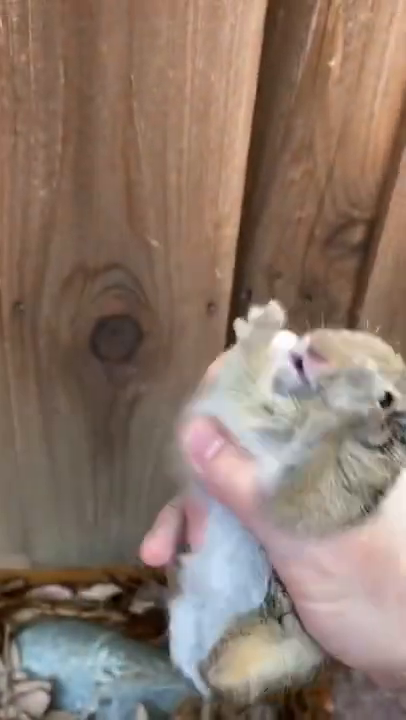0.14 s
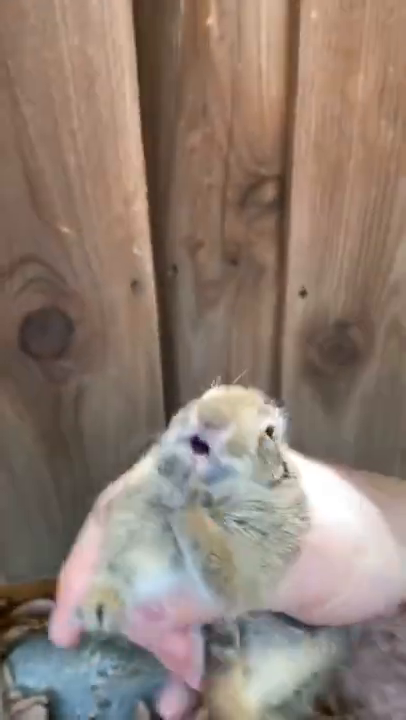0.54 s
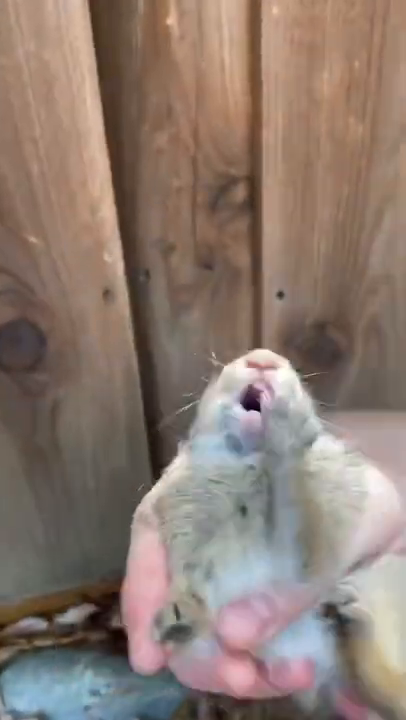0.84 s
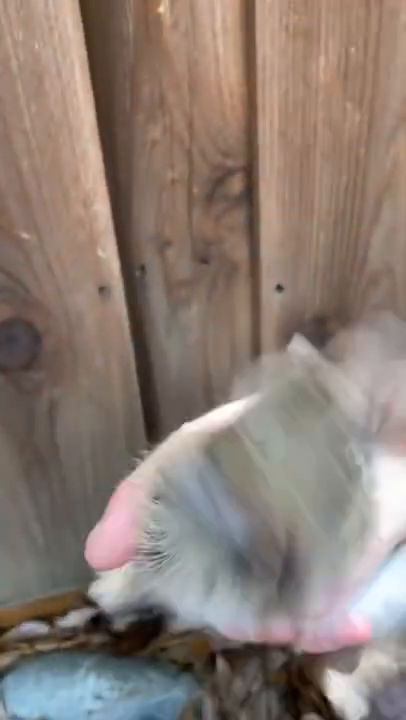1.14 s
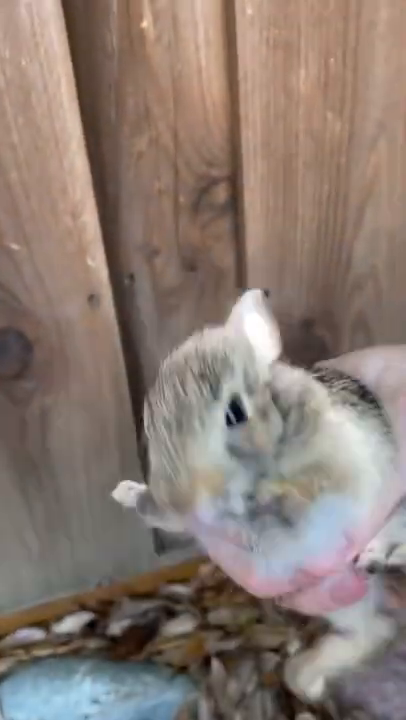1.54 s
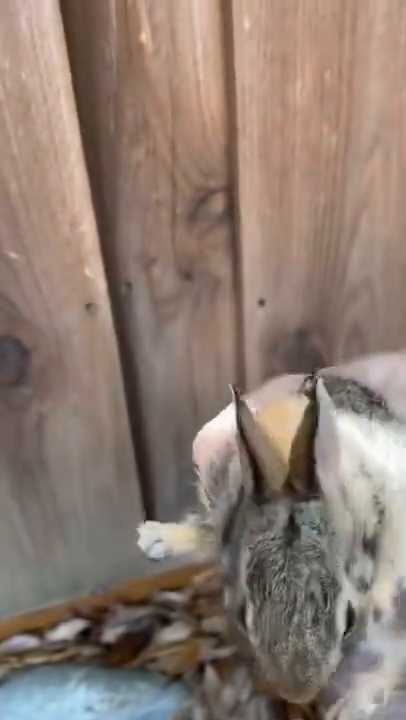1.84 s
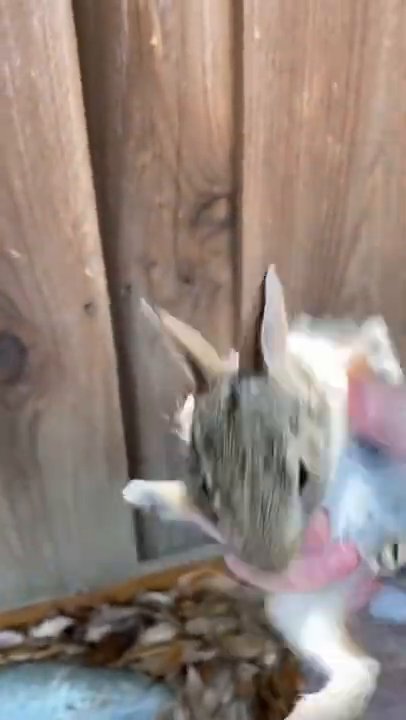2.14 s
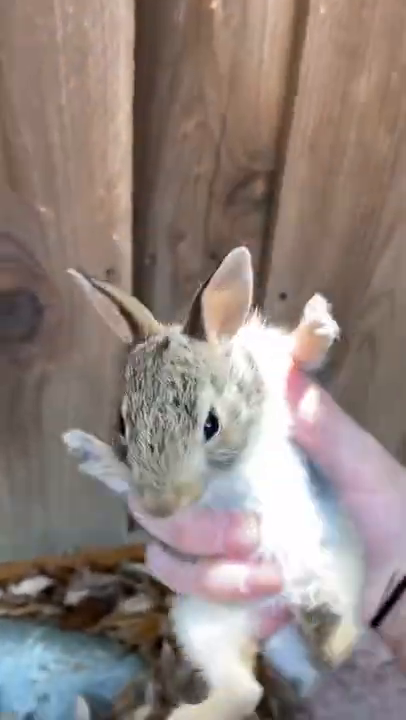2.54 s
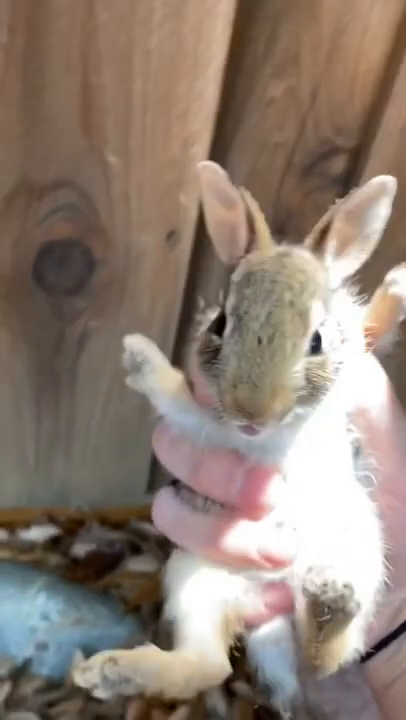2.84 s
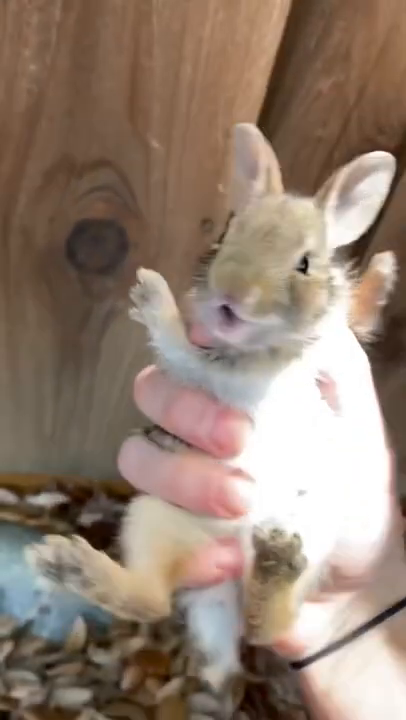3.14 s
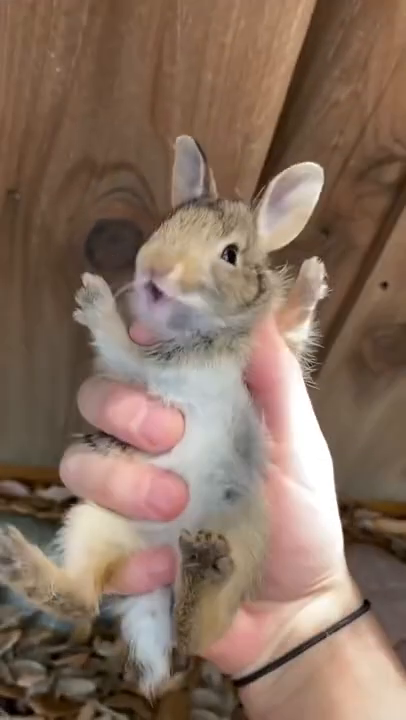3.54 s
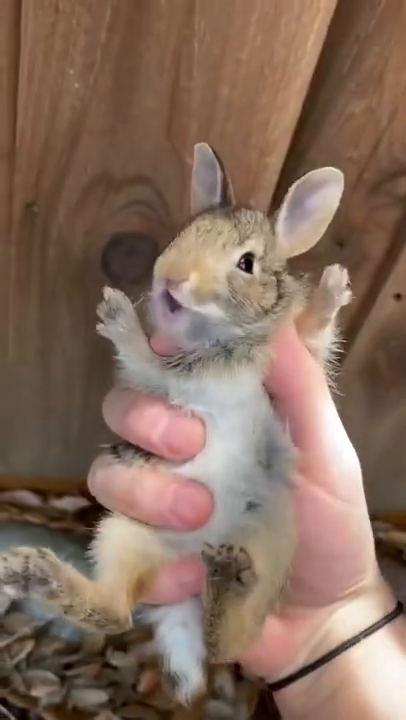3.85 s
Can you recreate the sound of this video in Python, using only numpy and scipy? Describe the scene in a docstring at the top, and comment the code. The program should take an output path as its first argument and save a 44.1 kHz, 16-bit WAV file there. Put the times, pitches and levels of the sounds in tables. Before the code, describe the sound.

A young rabbit squeals loudly and harshly again and again, close up in a yard

```python
"""Young rabbit squealing, close

In a yard, before a wooden fence: a young rabbit held in the hand squeals twelve times close to a phone in stereo.
Each squeal is a stack of overtones through gliding resonances: thin while the mouth is nearly shut, fuller as it
opens, then sagging in pitch and breaking into a rasp. Decaying noise gives the yard's faint tail; below lie
low outdoor rumble and hiss of filtered noise, faint far tones of wavering sine and two soft handling bumps."""
import sys
import numpy as np
from scipy import signal
from scipy.fft import rfft, irfft
from scipy.io import wavfile
from scipy.ndimage import uniform_filter1d

SR = 44100
rng = np.random.default_rng(int(sys.argv[2]) if len(sys.argv) > 2 else 0)


def unload_wav(signal):
    """Save mono or channel-first audio to the path in sys.argv[1] as 16-bit WAV at rate SR, clipped to [-1, 1]."""
    wavfile.write(
        sys.argv[1],
        SR,
        np.round(np.clip(np.atleast_2d(signal).T, -1, 1) * 32767).astype(np.int16),
    )


N = 176400

# outdoor rumble, relative spectrum: [f/Hz, level/dB]
RUMBLE_SPECTRUM = [(20, -28), (32, -24.5), (45, -6), (62, 4.5), (85, 0), (120, -2.5), (170, -12.5),
                   (250, -19), (400, -26), (600, -34.5), (1200, -41), (2500, -41.5), (6000, -51)]
# faint far tones: [start t/s, length t/s, f/Hz, peak level/dB]
FAR_TONES = [(-.05, 0.43, 422, -68.5), (0.809, 0.22, 368, -69.5), (3.025, 0.337, 398.5, -66.5),
             (3.543, 0.18, 363, -70)]
# handling bumps: [t/s, level/dB, f/Hz]
BUMPS = [(1.618, -44.5, 85), (2.319, -43.5, 150)]
# relative colour of the yard's long tail: [f/Hz, level/dB]
YARD_COLOUR = [(500, -17), (1000, 3.5), (2500, 9), (4300, 0), (5500, -8.5), (8000, -14), (12000, -5),
               (16000, -22)]
# first echoes from the hand, fence and ground: [delay t/s, level/dB]
ECHOES = [(.0008, -22.5), (.0021, -20.5), (.0041, -23)]
# phase between the two microphone ports: [f/Hz, lead of left over right/rad]
PORT_PHASE = [(100, 0), (1000, .3), (3000, .25), (4200, .85), (5200, .55), (6000, 1.5), (6900, 3),
              (7600, 3.3), (9000, 4.7), (10000, 6.1), (11000, 6.4), (12000, 7.8), (13200, 9.3),
              (14300, 9.6), (16000, 12)]
# level between the two microphone ports: [f/Hz, left minus right level/dB]
PORT_BALANCE = [(100, 0), (1000, -1), (2400, 0), (3400, -4), (4400, -5), (5000, .3), (7000, 0)]
# throat and mouth resonances in three groups, not in order of pitch; the steady ones have no level per squeal:
# [f shut/Hz, f wide open/Hz, width/Hz, level shut/dB, level wide open/dB]
STEADY_RESONANCES = [(1080, 1100, 870, -10, -16.5), (2240, 2600, 654, 3.5, -22), (4400, 5160, 817, -9, 10)]
FOUR_KHZ_RESONANCE = [(3290, 4250, 854, 0.81, -1.8)]
UPPER_RESONANCES = [(5750, 6335, 810, -9, 0.5), (9570, 8010, 1580, 1, -2),
                    (12400, 10800, 2000, -10.5, -11.5), (14200, 13140, 1900, -1.5, -7.5)]
# one row per squeal: [start t/s, end t/s, time for the mouth to open t/s, widest opening (0-1),
# roughness (0-1), four-kHz resonance level/dB, upper resonances level/dB]
SQUEALS = [(-.15, 0.041, .1, 0.67, 0.1, -11.5, 6), (0.158, 0.471, 0.19, 0.99, 0.18, -7, 8),
           (0.595, 0.809, .12, 0.91, 0.25, -9.5, 5.5), (0.971, 1.241, 0.12, 0.68, 0.2, -2, 5),
           (1.445, 1.612, 0.12, 0.95, 0.11, 0.5, 1), (1.757, 1.949, 0.12, 0.84, 0.2, 1.5, 2.5),
           (2.132, 2.309, 0.075, .9, 0.18, -1, 2), (2.496, 2.692, 0.077, 0.88, 0.4, -3, 2.5),
           (2.825, 3.011, 0.079, 0.94, 0.23, -7, 2.5), (3.205, 3.406, 0.076, 0.98, 0.42, -2.5, 2.5),
           (3.535, 3.733, 0.089, 0.93, 0.25, -2.5, 0), (3.869, 4.07, 0.086, 0.93, .18, 0, 1)]
# course of the first squeal, under way at the start: [t/s, pitch f/Hz, level/dB before VOICE_DB]
FIRST_COURSE = [
    [(0.004, 935, -26), (0.024, 907, -34.5), (0.035, 936, -39.5)],
]
# courses of the other squeals: [t/s, pitch f/Hz, level/dB before VOICE_DB]
LATER_COURSES = [
    [(0.169, 1044, -47.5), (0.181, 1230, -36.5), (0.197, 1233, -27), (0.215, 1137, -30),
     (0.287, 963.7, -28.5), (0.381, 990, -18.5), (0.413, 1027, -21.5), (0.453, 868, -25), (0.466, 771, -35)],
    [(0.603, 1154, -42.5), (0.653, 1147, -28), (0.681, 997, -25), (0.711, 1086, -21.5), (0.729, 1034, -23),
     (0.777, 1012, -23), (0.785, 869, -22.5), (0.802, 827, -31)],
    [(0.982, 1096, -51), (0.994, 1159, -37.5), (1.016, 1170, -31), (1.072, 1037, -23), (1.106, 975, -25.5),
     (1.176, 1015, -24.5), (1.196, 905, -26.5), (1.204, 958, -26.5), (1.238, 814, -34.5)],
    [(1.452, 1080, -45.5), (1.482, 1034, -36.5), (1.52, 1060, -24), (1.554, 1072, -23), (1.596, 824, -29.5),
     (1.604, 833, -42.5)],
    [(1.772, 956, -53.5), (1.788, 1044, -44), (1.83, 998.3, -30), (1.876, 1067, -25), (1.892, 1047, -25),
     (1.918, 986.5, -27.5), (1.93, 841, -27.5), (1.94, 848, -36)],
    [(2.138, 1052, -43), (2.152, 980, -38), (2.176, 1047, -25.5), (2.206, 1109, -23.5),
     (2.248, 1074, -21.5), (2.276, 1040, -22.5), (2.288, 936, -24), (2.298, 934, -39)],
    [(2.503, 993, -45), (2.517, 976, -38.5), (2.553, 1031, -24), (2.583, 1087, -23), (2.635, 1059, -22.5),
     (2.653, 997, -21.5), (2.663, 972, -23), (2.667, 858, -22.5), (2.684, 783, -37.5)],
    [(2.83, 988, -43), (2.84, 975, -41), (2.86, 950, -29.5), (2.886, 992, -22.5), (2.91, 1013, -20.5),
     (2.93, 1077, -20.5), (2.97, 984, -20), (2.982, 981, -21.5), (3.004, 821.5, -31)],
    [(3.21, 1013, -45.5), (3.222, 1005, -34), (3.254, 1022, -24), (3.296, 1097, -20.5),
     (3.358, 1040, -20.5), (3.366, 1022, -20.5), (3.382, 926, -24.5), (3.39, 846, -26), (3.398, 818, -32.5)],
    [(3.544, 941, -51.5), (3.56, 923.6, -36), (3.598, 953.4, -27), (3.628, 1026, -23.5),
     (3.666, 1013, -20.5), (3.692, 989, -25), (3.704, 951, -22.5), (3.714, 835.5, -29.5),
     (3.725, 818, -35.5)],
    [(3.876, 950, -45), (3.888, 889, -40.5), (3.91, 938.6, -32), (3.92, 930, -30), (3.964, 1012, -22),
     (3.992, 999.3, -22.5)],
]

# background and handling
RUMBLE_DB, RUMBLE_SIDE_DB, HISS_DB = -60.5, -21, -90.5  # the side level is relative to the rumble
BUMP_SCUFF_HZ, BUMP_DECAY_S, BUMP_SCUFF_DB = 348, 0.0082, -11
# the place: total level against the voice, and time to fall by 60 dB
FENCE_DB, FENCE_T60_S = -27, .075
YARD_DB, YARD_T60_S = -35, .6
# time course of a squeal
ATTACK_S, RELEASE_S = 0.0046, 0.0034
CATCH_S, CATCH_ROUGH = .035, .4  # roughness added as the voice catches
BREAK_S, BREAK_ROUGH = .03, 1.45  # lead of the break before the end, roughness added
BREAK_DB_PER_OCTAVE = -3.5  # the breaking voice darkens
RESONANCE_SAG = 0.015  # share by which the resonances fall as the voice breaks
FINAL_DROP, DROP_S = 0.041, 0.0067  # share by which the pitch drops at the very end
# unsteadiness: pitch depths as shares; all but the tremor and flicker grow with roughness
TREMOR, TREMOR_HZ = .004, 45
WOBBLE, WOBBLE_HZ = .016, 172
JITTER, JITTER_HZ = .012, 420
SHIMMER_DB, SHIMMER_HZ = 1, 180
FLICKER_DB, FLICKER_HZ = 3.5, 12.7  # each overtone wavers in strength; depth at 5 kHz
# breath noise around each overtone: level at 5 kHz and roughness 1
AIR_DB, AIR_DB_PER_OCTAVE, AIR_SPREAD_HZ = -12, 8, 520
CATCH_AIR_DB = 5.5  # extra air before the mouth is open
VOICE_DB = 2.5  # lift on the course levels
TOP_HZ = 15800


def undb(db):
    """Decibels to gain."""
    return 10 ** (np.asarray(db) / 20)


def unit(x):
    """Scale to rms 1."""
    return x / np.sqrt(np.mean(x ** 2))


def per_bin(points):
    """A table by frequency, read at every bin along a logarithmic axis."""
    hz, value = np.array(points, float).T
    bins = np.fft.rfftfreq(N, 1 / SR)
    return np.interp(np.log(bins + 1), np.log(hz), value)


def coloured(points):
    """Noise of rms 1 with the given spectrum."""
    white = rfft(rng.standard_normal(N))
    return unit(irfft(white * undb(per_bin(points)), N))


def flutter(hz, order=2):
    """Random motion of rms 1: noise low-passed at hz."""
    lowpass = signal.butter(order, hz, fs=SR, output="sos")
    return unit(signal.sosfilt(lowpass, rng.standard_normal(N)))


def background(t):
    """Low rumble, nearly alike in both channels, a trace of hiss and a few far tones."""
    spectrum = list(RUMBLE_SPECTRUM) + [(16000, -60.5)]
    middle = coloured(spectrum)
    side = undb(RUMBLE_SIDE_DB) * coloured(spectrum) * np.array([[1], [-1]])
    hiss = undb(HISS_DB) * rng.standard_normal((2, N))
    out = undb(RUMBLE_DB) * (middle + side) + hiss
    waver = 1 + 0.073 * flutter(30)  # shared pitch waver of the far tones
    for start, length, hz, db in FAR_TONES:
        swell = np.sin(np.pi * np.clip((t - start) / length, 0, 1))
        tone = np.sin(2 * np.pi * np.cumsum(hz * waver) / SR)
        out = out + undb(db) * swell * tone
    return out


def bumps(t):
    """Dull knocks, decaying sines with a little scuff noise, as the rabbit kicks in the hand."""
    out = 0
    scuff = undb(BUMP_SCUFF_DB) * flutter(BUMP_SCUFF_HZ)
    for at, db, hz in BUMPS:
        age = np.maximum(t - at, 0)
        envelope = np.minimum(age / 0.0023, 1) * np.exp(-age / BUMP_DECAY_S)
        knock = np.sin(2 * np.pi * hz * age)
        out = out + undb(db) * (knock + scuff) * envelope
    return out


def tail(t, t60, noise):
    """Exponentially decaying noise of total energy 1, beginning after 3 ms."""
    decay = noise * np.exp(-np.log(1000) * t / t60) * (t > .003)
    return decay / np.sqrt(np.sum(decay ** 2))


def yard(x, t):
    """Quick scatter from fence and ground and a faint longer tail, drawn separately per channel."""
    channels = []
    for _ in range(2):
        scatter = undb(FENCE_DB) * tail(t, FENCE_T60_S, rng.standard_normal(N))
        long_tail = undb(YARD_DB) * tail(t, YARD_T60_S, coloured(YARD_COLOUR))
        channels.append(signal.fftconvolve(x, scatter + long_tail)[:N])
    return np.array(channels)


def ports(x):
    """The near voice reaches the left port a little before the right; phase and level split evenly."""
    half = np.exp(.5j * per_bin(PORT_PHASE)) * undb(per_bin(PORT_BALANCE) / 2)
    left = irfft(rfft(x) * half, N)
    right = irfft(rfft(x) / half, N)
    return np.array([left, right])


def throat(hz, resonances, mouth, breaking):
    """Power passed at hz by resonances that glide and change strength as the mouth opens."""
    power = 0
    for shut_hz, open_hz, width, shut_db, open_db in resonances:
        centre = (shut_hz + (open_hz - shut_hz) * mouth) * (1 - RESONANCE_SAG * breaking)
        peak = undb(shut_db + (open_db - shut_db) * mouth) ** 2
        power = power + peak / (1 + ((hz - centre) / width) ** 2) ** 4
    return power


def squeal(t, row, course, unsteady, flicker, air):
    """One cry: overtones through the opening mouth, rough as the voice catches and again as it breaks."""
    start, end, opening_s, wide, roughness, four_khz_db, upper_db = row
    times, pitch, level_db = np.array(course, float).T
    jitter, wobble, shimmer, tremor = unsteady

    mouth = wide * np.sin(np.pi / 2 * np.clip((t - start) / opening_s, 0, 1)) ** 2
    breaking = 1 / (1 + np.exp(np.clip((end - BREAK_S - t) / .008, -50, 50)))  # 0 to 1
    catch = np.exp(-(t - start) / CATCH_S)
    rough = roughness + BREAK_ROUGH * breaking + CATCH_ROUGH * catch

    pitch = uniform_filter1d(np.interp(t, times, pitch), size=450)  # rounds the corners
    final_drop = 1 - FINAL_DROP * np.exp(np.minimum(t - end, 0) / DROP_S)
    pitch = pitch * (1 + TREMOR * tremor + rough ** 2 * WOBBLE * wobble) * final_drop
    phase = 2 * np.pi * np.cumsum(pitch * (1 + rough * JITTER * jitter)) / SR

    k = np.arange(1, len(air) + 1)[:, None]  # overtone numbers
    hz = k * pitch
    height = hz / 5000
    octaves = np.log2(height)  # above 5 kHz
    groups = [(STEADY_RESONANCES, 0), (FOUR_KHZ_RESONANCE, four_khz_db), (UPPER_RESONANCES, upper_db)]
    power = sum(undb(db) ** 2 * throat(hz, resonances, mouth, breaking) for resonances, db in groups)
    waver_db = FLICKER_DB * np.sqrt(height) * flicker
    darkening_db = BREAK_DB_PER_OCTAVE * breaking * octaves
    strength = np.sqrt(power) * undb(waver_db + darkening_db) * (hz < SR / 2)

    air_db = AIR_DB + CATCH_AIR_DB * (wide - mouth) + AIR_DB_PER_OCTAVE * octaves
    rasp = 1 + rough * undb(air_db) * air
    overtones = np.exp(1j * (k * phase + rng.uniform(0, 2 * np.pi, k.shape)))
    voice = np.sum(strength * np.real(rasp * overtones), axis=0)
    voice = voice * undb(SHIMMER_DB * rough * shimmer)

    # even out the running level, then follow the course
    voice = voice / np.sqrt(uniform_filter1d(voice ** 2, size=900) + 1e-12)
    gate = np.clip((t - start) / ATTACK_S, 0, 1) * np.clip((end - t) / RELEASE_S + .5, 0, 1)
    return voice * gate * undb(np.interp(t, times, level_db) + VOICE_DB)


def rabbit(t, count=18):
    """The run of squeals, each of count overtones with their own flicker and breath noise."""
    out = np.zeros(N)
    jitter, wobble = flutter(JITTER_HZ, order=4), flutter(WOBBLE_HZ)
    shimmer, tremor = flutter(SHIMMER_HZ, order=4), flutter(TREMOR_HZ)
    unsteady = np.array([jitter, wobble, shimmer, tremor])
    flicker = np.array([flutter(FLICKER_HZ) for _ in range(count)])
    # complex noise spreads each overtone to both sides
    air = np.array([flutter(AIR_SPREAD_HZ, order=4) + 1j * flutter(AIR_SPREAD_HZ, order=4)
                    for _ in range(count)])
    for row, course in zip(SQUEALS, list(FIRST_COURSE) + list(LATER_COURSES)):
        now = (t >= row[0]) & (t < row[1] + RELEASE_S)
        out[now] += squeal(t[now], row, course, unsteady[:, now], flicker[:, now], air[:, now])
    return out


def scene():
    """The rabbit close up, its first echoes and the yard around it."""
    t = np.arange(N) / SR
    voice = rabbit(t)
    near = voice
    for delay, db in ECHOES:
        near = near + undb(db) * np.pad(voice, (int(delay * SR), 0))[:N]
    return background(t) + bumps(t) + yard(voice, t) + ports(near)


def record(dry):
    """The phone cuts the top with a steep low-pass at TOP_HZ."""
    lowpass = signal.ellip(14, .2, 80, TOP_HZ, fs=SR, output="sos")
    return signal.sosfilt(lowpass, dry)


dry = scene()
out = record(dry)
unload_wav(out)
```